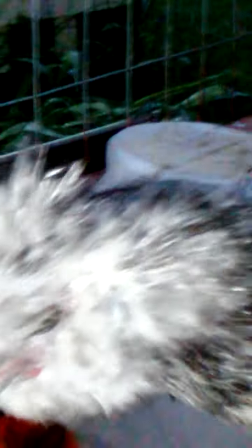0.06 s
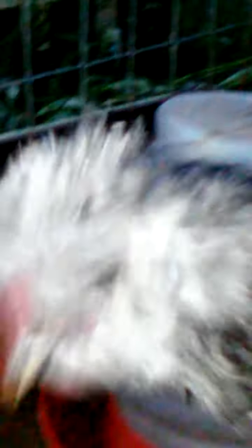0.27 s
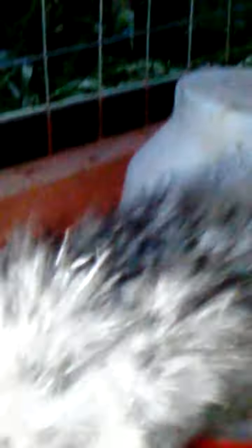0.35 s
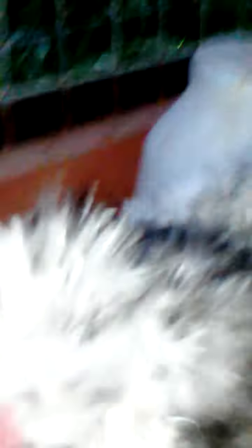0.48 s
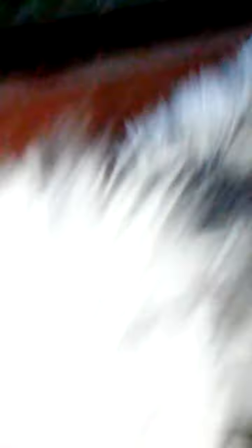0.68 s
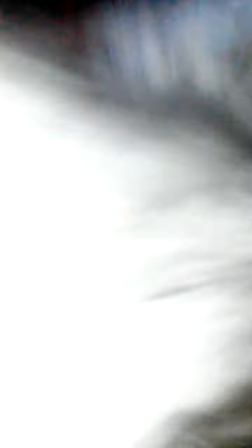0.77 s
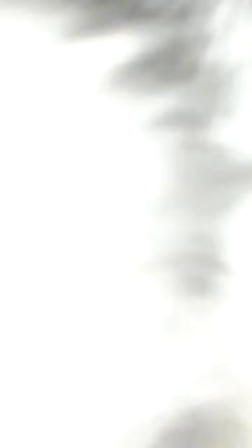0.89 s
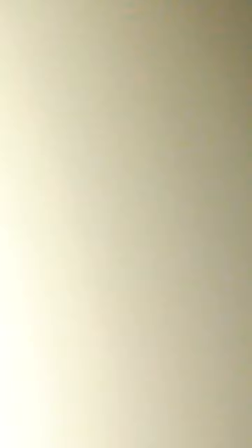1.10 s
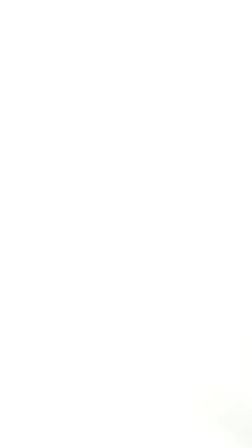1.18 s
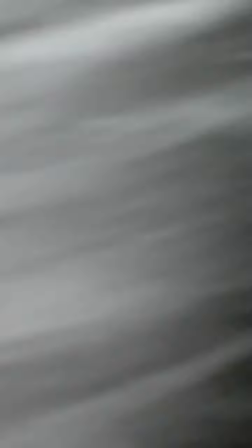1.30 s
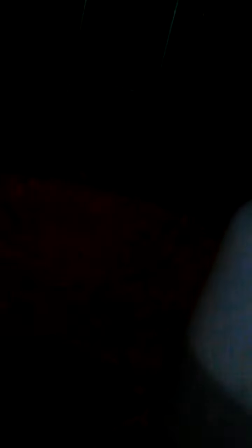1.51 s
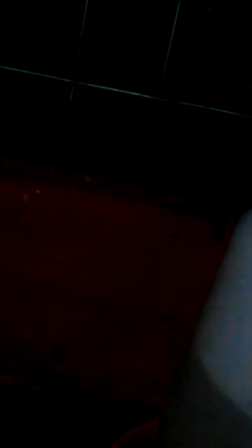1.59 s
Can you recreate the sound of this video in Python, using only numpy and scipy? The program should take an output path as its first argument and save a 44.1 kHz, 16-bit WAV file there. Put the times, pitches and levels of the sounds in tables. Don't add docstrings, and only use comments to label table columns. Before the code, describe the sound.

Close soft hen clucks in a quick run, then feathery rustling, small taps and sparrow chirps behind

```python
import sys
import numpy as np
from scipy import signal
from scipy.fft import rfft, irfft
from scipy.io import wavfile
from scipy.ndimage import uniform_filter1d

SR = 44100
rng = np.random.default_rng(int(sys.argv[2]) if len(sys.argv) > 2 else 0)


def magnitude_from_level(level_db):
    exponent = np.asarray(level_db, float) / 20
    return 10 ** exponent


def wav_record(signal):
    frames = np.transpose(np.atleast_2d(signal))
    bounded = np.clip(frames, -1, 1)
    quanta = np.round(bounded * 32767).astype(np.int16)
    wavfile.write(sys.argv[1], SR, quanta)


N = 72765
T = np.arange(N) / SR


def colour(x, points):
    hz, db = np.array(points, float).T
    grid_hz = np.arange(1025) * SR / 2048 + 1
    log_gain = np.interp(np.log(grid_hz), np.log(hz), db) * np.log(10) / 20
    cepstrum = irfft(log_gain)
    cepstrum[1:1024] *= 2
    cepstrum[1025:] = 0
    return signal.fftconvolve(x, irfft(np.exp(rfft(cepstrum))))[:N]


def ring(x, hz, width_hz):
    return signal.lfilter(*signal.iirpeak(hz, hz / max(width_hz, 20), fs=SR), x)


def level(x, db):
    return x * magnitude_from_level(db) / np.sqrt(np.mean(x ** 2))


def walk(rate_hz):
    k = int(SR / rate_hz)
    w = uniform_filter1d(uniform_filter1d(rng.standard_normal(N), k), k)
    return w / w.std()


def swell(start_s, length_s, rise, fall):
    u = (T - start_s) / length_s
    ramp = np.clip(np.minimum(u / rise, (1 - u) / fall), 0, 1)
    return np.sin(np.pi / 2 * ramp) ** 2


def click(at_s):
    samples = (T - at_s) * SR
    return np.sinc(samples) * (np.abs(samples) < 16)


def echoes(x, t60_s, gap_s):
    t = T[:SR // 3]
    decay = np.exp(-np.log(1000) * t / t60_s)
    tail = rng.standard_normal(len(t)) * decay * np.clip(t / gap_s, 0, 1)
    return signal.fftconvolve(x, tail / np.sqrt(np.sum(tail ** 2)))[:N]


def air():
    # frequency in Hz, level in dB.
    hush_points = [(30, -28), (90, -10), (140, 1), (500, -1.5), (1500, -4.5), (3000, -7), (8000, -2.5),
                   (16000, -6)]
    hush = level(colour(rng.standard_normal(N), hush_points), -48.5) * magnitude_from_level(0.7 * walk(5))
    insect_hz, insect_width_hz, insect_db = 3712, 720, -57
    band = ring(rng.standard_normal(N), insect_hz, insect_width_hz)
    band = ring(band, insect_hz, insect_width_hz)
    return hush + level(band, insect_db) * magnitude_from_level(0.28 * walk(2) + 4.8 * walk(28))


def sparrows():
    # start in seconds, length in seconds, start pitch in Hz, end pitch in Hz, level in dB.
    chirp_rows = [(.01, 0.043, 3040, 2810, -44.5), (0.017, 0.047, 2690, 2160, -35),
                  (0.054, .04, 2220, 2110, -52), (0.07, 0.044, 2620, 2530, -39.5),
                  (.096, 0.029, 2454, 1930, -37), (0.114, 0.024, 2640, 3040, -41),
                  (0.138, 0.018, 2360, 2230, -32.5), (0.135, 0.057, 3032, 2389, -30.5),
                  (0.178, 0.023, 2518, 2185, -28.5), (0.216, 0.038, 2746, 2420, -40),
                  (0.233, 0.012, 2320, 2280, -50.5), (.282, 0.034, 3000, 2930, -47),
                  (.316, 0.015, 2990, 2310, -43), (0.324, .016, 2860, 2560, -33.5),
                  (0.29, 0.036, 2530, 2230, -53.5), (.562, 0.024, 2880, 2760, -35.5),
                  (0.578, 0.041, 2805, 2250, -36.5), (0.614, 0.03, 2340, 2049, -30),
                  (.625, .011, 2230, 2120, -29.5), (0.636, 0.037, 2060, 1957, -38),
                  (.646, 0.013, 2075, 2260, -31.5), (0.783, 0.029, 2900, 2830, -39.5),
                  (.788, 0.038, 2714, 2210, -37), (.836, 0.0236, 2500, 2360, -42.5),
                  (0.861, 0.038, 3325, 2936, -44.5), (0.892, 0.034, 2880, 2243, -39),
                  (.92, 0.03, 2217, 2180, -42), (0.948, 0.049, 3037, 2177, -34.5),
                  (1.135, .05, 3620, 1900, -37), (1.162, .018, 2672, 2120, -29),
                  (1.176, .024, 1848, 2040, -37.5), (1.408, 0.083, 2600, 2400, -46.5),
                  (1.469, 0.026, 2534, 2150, -43), (1.494, 0.024, 2270, 2370, -48),
                  (1.58, 0.053, 2850, 2070, -43)]
    leaf_lags_s = [.006, .013, .021, .03]
    leaf_db = -3.6
    warble_db, warble_share = 2.7, 0.009
    hedge_t60_s, hedge_db = 0.15, -3.5
    out = np.zeros(N)
    bend = 1 + warble_share * walk(150)
    flutter_db = warble_db * (0.45 * walk(120) + walk(600))
    for s, length_s, start_hz, end_hz, db in chirp_rows:
        hz = np.interp(T, [s, s + length_s], [start_hz, end_hz]) * np.roll(bend, int(s * 7 * SR))
        shape = swell(s, length_s, 0.55, 0.2) ** 0.65
        shape = shape * magnitude_from_level(np.roll(flutter_db, int(s * 5 * SR)))
        out += magnitude_from_level(db) * shape * np.sin(2 * np.pi * np.cumsum(hz) / SR)
    branches = sum(magnitude_from_level(leaf_db * (k + 5)) * np.roll(out, int(lag_s * SR))
                   for k, lag_s in enumerate(leaf_lags_s))
    return out + branches + magnitude_from_level(hedge_db) * echoes(out, hedge_t60_s, 0.013)


def coos():
    # start in seconds, length in seconds, pitch in Hz, level in dB, third partial in dB.
    coo_rows = [(0.117, 0.025, 258.1, -51, -8), (0.129, 0.057, 269.3, -62.5, 14),
                (0.262, 0.021, 940, -42, -36), (0.307, 0.13, 249, -51, -3), (0.561, 0.036, 506.6, -44, -44),
                (0.566, 0.077, 265, -53.5, -3), (0.589, 0.048, 1016, -38.5, -47),
                (.735, 0.045, 496, -43.5, -43.5), (.736, 0.16, 251, -47.5, -16),
                (0.826, 0.071, 760, -60, -42), (0.971, 0.11, 257.2, -47, -8.5)]
    out = np.zeros(N)
    drift = 1 + 0.006 * walk(25)
    flutter = magnitude_from_level(2.2 * walk(60))
    for s, length_s, hz, db, third_db in coo_rows:
        phase = 2 * np.pi * np.cumsum(hz * drift) / SR
        hum = np.sin(phase) + magnitude_from_level(third_db) * np.sin(3 * phase)
        fade_db = -4 * (hz > 400) * np.clip(T - s, 0, 1) / length_s
        out += magnitude_from_level(db) * swell(s, length_s, 0.091, 0.41) * magnitude_from_level(fade_db) * hum
    return out * flutter * np.sqrt(2)


def brushes():
    # start in seconds, length in seconds, hiss level in dB, thump level in dB.
    brush_rows = [
        (0.998, 0.04, -25, -50.5),
        (1.011, 0.067, -31.5, -54),
        (1.062, 0.048, -23.5, -44.5),
        (1.099, 0.083, -27.5, -77),
        (1.136, .03, -38.5, -79),
        (1.141, 0.12, -41, -93),
        (1.302, 0.059, -47, -54.5),
        (0.079, 0.036, -87, -49),
        (1.615, 0.019, -66.5, -48.5),
    ]
    # frequency in Hz, level in dB.
    feather_points = [(100, -33), (1000, -24.5), (3000, -15.5), (4500, 0.5), (7000, -10.5), (11000, 3),
                      (16000, -7)]
    grain = rng.standard_normal(N) * magnitude_from_level(1.5 * walk(200))
    hiss = level(colour(grain, feather_points), 0)
    thump = ring(ring(ring(rng.standard_normal(N), 104, 580), 130, 690), 100, 750)
    thump = level(thump, 0)
    return sum(swell(s, length_s, 0.3, 0.4) * (magnitude_from_level(db) * hiss + magnitude_from_level(thump_db) * thump)
               for s, length_s, db, thump_db in brush_rows)


def straw():
    # start in seconds, length in seconds, level in dB.
    straw_rows = [(1, 0.052, -38.5), (1.064, 0.036, -38), (1.144, .04, -67.5), (1.295, 0.1, -53),
                  (1.504, 0.052, -49), (1.628, 0.013, -42)]
    rustle = level(ring(rng.standard_normal(N), 1530, 1600), 0)
    return sum(swell(s, length_s, 0.25, 0.71) * magnitude_from_level(db) * rustle for s, length_s, db in straw_rows)


def scrapes():
    # time in seconds, peak in dB, snap in dB.
    scrape_rows = [(1.026, -33, -21.5), (1.028, -38, -24.5), (1.071, -31.5, -24), (1.078, -21, 1.5),
                   (1.083, -27, -23.5), (1.0891, -16.5, -1), (1.096, -22, -11), (1.1022, -30, -7),
                   (1.3244, -42, 3.5)]
    out = np.zeros(N)
    noise = rng.standard_normal(N)
    for s, db, snap_db in scrape_rows:
        burst = noise * np.exp(-0.5 * ((T - s) / 0.00096) ** 2)
        snap = noise * np.exp(-0.5 * ((T - s + 0.001) / 0.0004) ** 2)
        port = ring(ring(burst, 3650, 450), 3650, 800)
        bright = ring(ring(ring(snap, 4500, 7000), 7000, 10000), 5200, 13000)
        body = ring(burst, 550, 1200)
        out += magnitude_from_level(db) * (port + magnitude_from_level(snap_db) * bright + magnitude_from_level(-15) * body) / np.abs(port).max()
    return out


def ticks():
    # time in seconds, peak in dB, ring in Hz, width in Hz.
    tick_rows = [(0.662, -33, 1150, 495), (.82, -37, 950, 590), (.927, -29.5, 1150, 690),
                 (1.002, -32, 700, 915), (1.237, -34.5, 1530, 1210), (1.237, -47.5, 412, 196),
                 (1.257, -42, 1430, 900), (1.3232, -24, 1180, 1240), (1.3232, -25.5, 2170, 1430),
                 (0.846, -43, 1320, 500), (1.577, -35, 1700, 625), (1.578, -47.5, 725, 302)]
    out = np.zeros(N)
    for s, db, hz, width_hz in tick_rows:
        tap = ring(ring(ring(click(s), hz, width_hz), hz, width_hz), hz, width_hz)
        out += magnitude_from_level(db) * tap / np.abs(tap).max()
    return out


def clucks():
    # start in seconds, pulse rate in Hz, level in dB, swell in dB, slowing share at the end.
    cluck_rows = [
        (0.2217, 240, -23, -13, 0.023),
        (0.355, 261.6, -16.5, 1, 0.018),
        (0.5225, 258.4, -12.5, -0.5, 0.009),
        (0.6926, 252.8, -16.5, 0.5, 0.04),
        (1.2895, 219, -29, -1.5, 0.),
        (1.634, 375, -30, -5, 0.0061),
    ]
    # main resonance in Hz, upper resonance in Hz, upper level in dB,
    # share of a mid-cycle pulse 0-1, high resonance in Hz.
    throats = [(940, 1313, 1.5, 1, 2500), (1150, 1413, 0.5, 0.13, 2210), (1023, 1361, 0, 0.73, 2500),
               (1060, 1275, 0, 0.34, 1400), (1175, 1590, -3, 0.25, 3100), (760, 1956, 7, 0.61, 910)]
    # first pulse in dB, last pulse in dB, high resonance in dB, throat width factor, throat drop share.
    efforts = [(-11.5, -1.5, -24, 1.01, .01), (-9, -2.5, -15, 1.01, .01), (-7, -2.5, -16, .85, -.02),
               (-8, -5, -13, 1.2, .05), (-2, -3, -26, 1.01, .01), (-8, -1.5, -13, 1.3, .01)]
    pulse_counts = [3, 4, 8, 10, 3, 7]
    closings_db = [-8, -10, -16, 0, 0, 0]
    hoarseness = [.08, .1, .03, .05, .1, .6]
    # extra length of the opening cycles as share of a period, accent on them in dB.
    openings = [(0, 0), (0, 0), (0, -2), (.09, 5), (0, 0), (0, 0)]
    # resonance in Hz, width in Hz, level in dB.
    chest = [(250, 133, -10), (453, 333, -7), (3428, 550, -28)]
    main_width_hz, upper_width_hz, high_width_hz = 380, 238, 1100
    breath_db = -38
    out = np.zeros(N)
    air_noise = rng.standard_normal(N)
    chances = rng.standard_normal((len(cluck_rows), 2, 16))
    per_cluck = zip(cluck_rows, throats, efforts, pulse_counts, closings_db, hoarseness, chances, openings)
    for row, throat, effort, count, close_db, hoarse, chance, (drag, accent_db) in per_cluck:
        s, hz, db, swell_db, sag = row
        main_hz, upper_hz, upper_db, half, high_hz = throat
        first_db, last_db, high_db, wide, sink = effort
        voice, pulses, sharp = np.zeros(N), np.zeros(N), np.zeros(N)
        for k in range(count):
            u = k / (count - 1)
            cycles = k * (1 + min(sag, 0.025) * u ** 3) + drag * (1 - np.exp(-k))
            cycles += 0.4 * hoarse ** 2 * chance[1, k]
            at = s + cycles / hz
            size_db = swell_db * u + accent_db * np.exp(-(k / 2.5) ** 2)
            size_db += first_db * (k == 0) + last_db * (k == count - 1)
            size = magnitude_from_level(size_db + (0.3 + 5 * hoarse) * chance[0, k])
            puff = magnitude_from_level(breath_db) * air_noise * swell(at, 0.87 / hz, 0.1, 0.71)
            sharp -= size * (0.3 if k == 0 else 1) * (click(at) + puff)
            pair = -size * (click(at) + half * click(at + 0.5 / hz))
            pulses += pair
            main_now_hz, upper_now_hz = main_hz * (1 - sink * u), upper_hz * (1 - sink * u)
            voice += ring(ring(pair, main_now_hz, main_width_hz * wide), main_now_hz, 1110)
            upper = ring(ring(pair, upper_now_hz, upper_width_hz * wide), upper_now_hz, 1300)
            voice -= magnitude_from_level(upper_db) * upper
        for f_hz, width_hz, gain_db in chest + [(high_hz, high_width_hz, high_db)]:
            source = pulses if f_hz < main_hz else sharp
            voice += magnitude_from_level(gain_db) * ring(ring(source, f_hz, width_hz), f_hz, 0.24 * width_hz)
        voice = signal.sosfilt(signal.butter(2, 4500, fs=SR, output="sos"), voice)
        voice = voice * magnitude_from_level(close_db * np.clip((T - at - 0.0018) / 0.0012, 0, 1))
        out += voice * magnitude_from_level(db) / np.sqrt(np.sum(voice ** 2) * hz / (count * SR))
    return out


def scene():
    pen_t60_s, pen_db = 0.13, -13
    near = clucks() + ticks()
    pen = magnitude_from_level(pen_db) * echoes(near, pen_t60_s, 0.0013)
    touch = brushes() + straw() + scrapes()
    return (near + pen + coos() + sparrows() + touch + air())[None]


def roll_off(x):
    return signal.sosfilt(signal.butter(12, 15730, fs=SR, output="sos"), x)


def record(dry):
    # frequency in Hz, gain in dB.
    mic_points = [(3000, 1.5), (3800, 1), (4150, -8.5), (4450, -27), (5500, -20.5), (6300, -9), (8300, -9),
                  (9300, -18.5)]
    thin = signal.sosfilt(signal.butter(2, 70, "high", fs=SR, output="sos"), dry[0])
    thin = signal.sosfilt(signal.ellip(10, 0.2, 60, 15750, fs=SR, output="sos"), thin)
    return roll_off(colour(thin, mic_points)[None])


dry = scene()
out = record(dry)
wav_record(out)
```